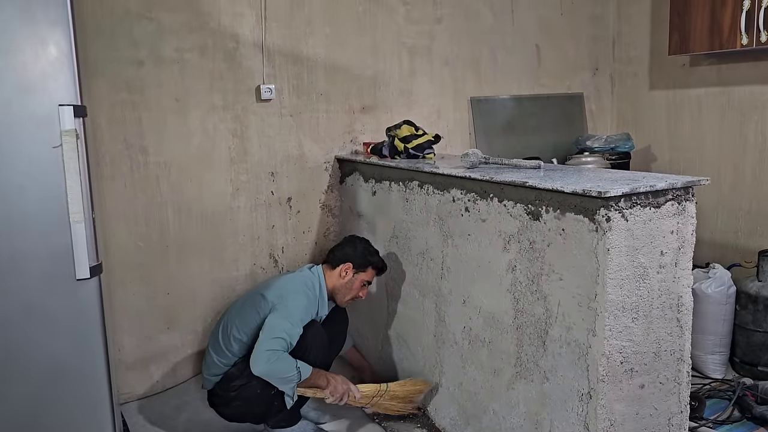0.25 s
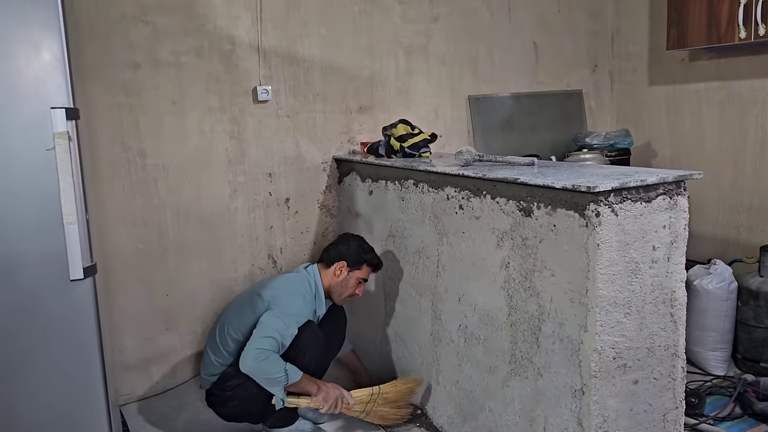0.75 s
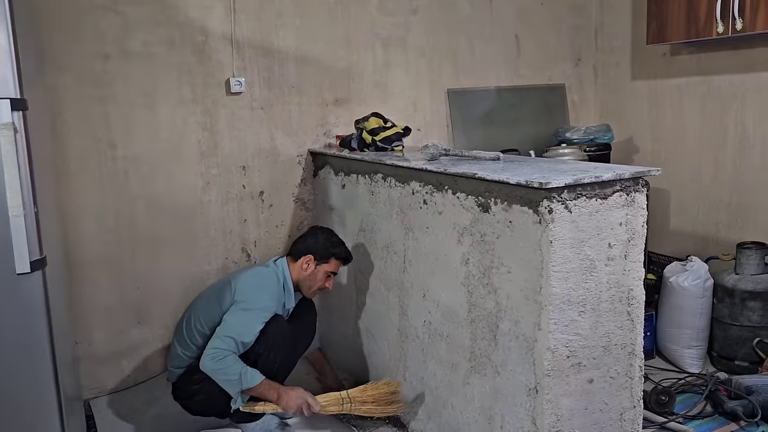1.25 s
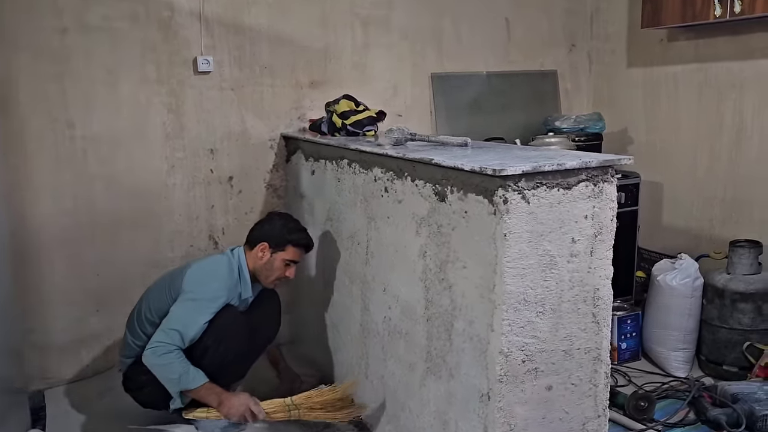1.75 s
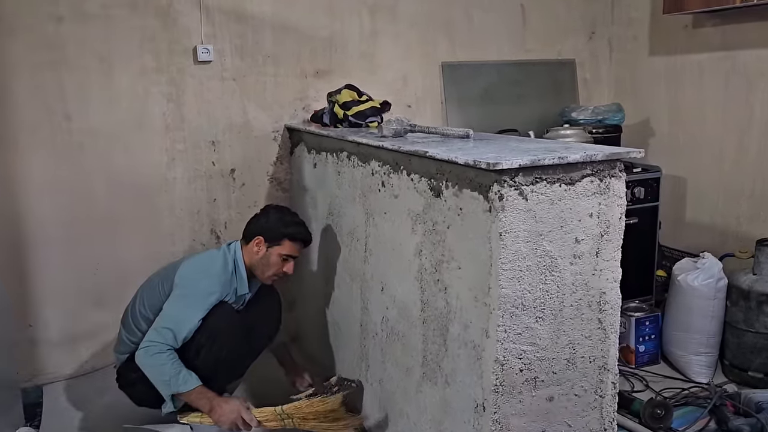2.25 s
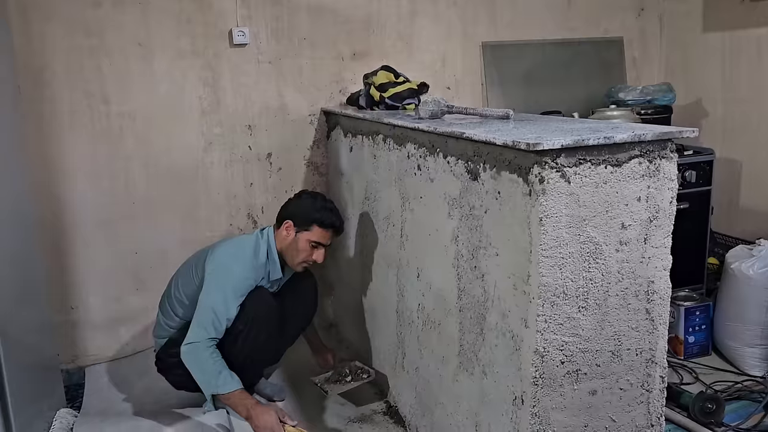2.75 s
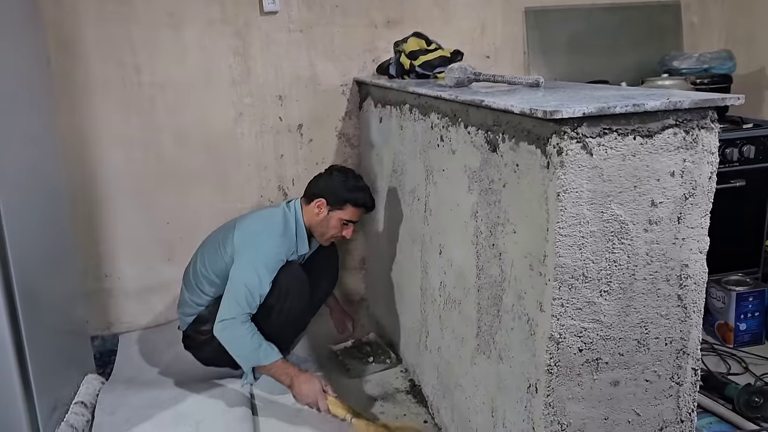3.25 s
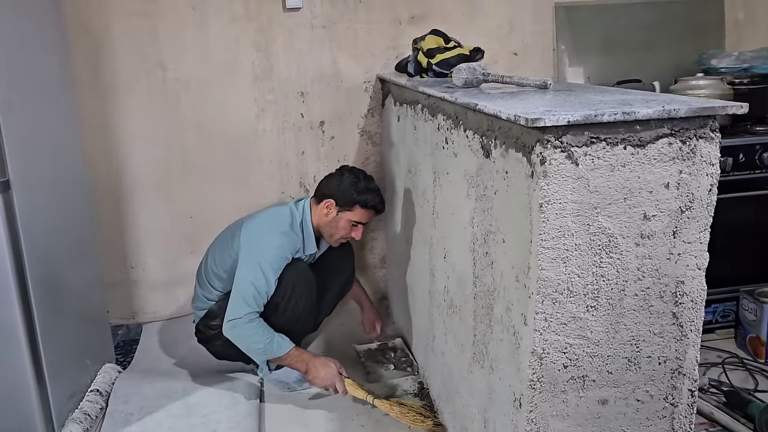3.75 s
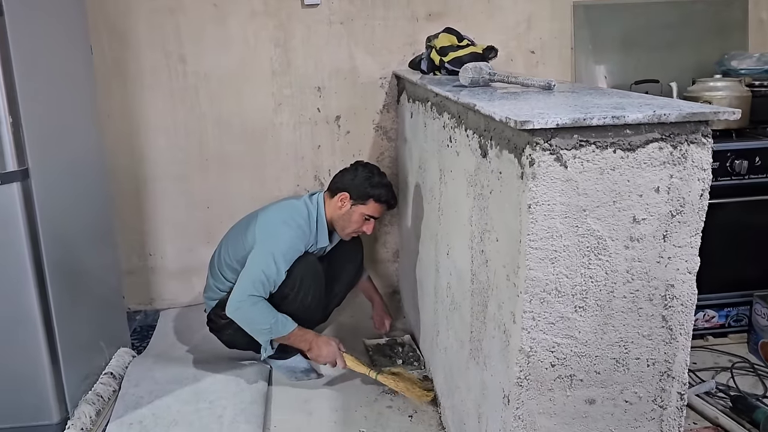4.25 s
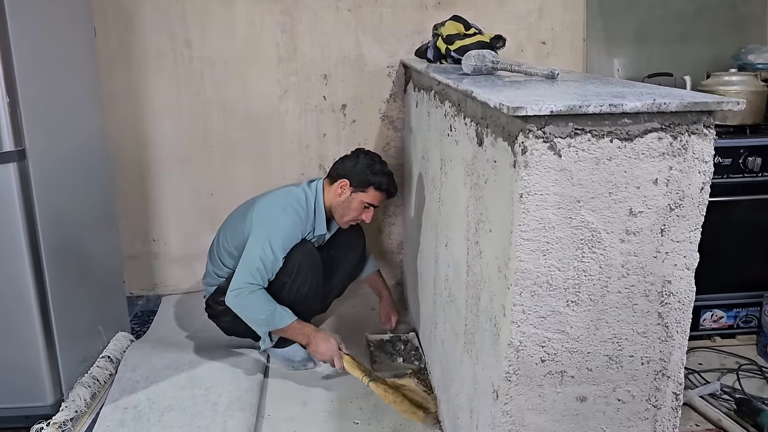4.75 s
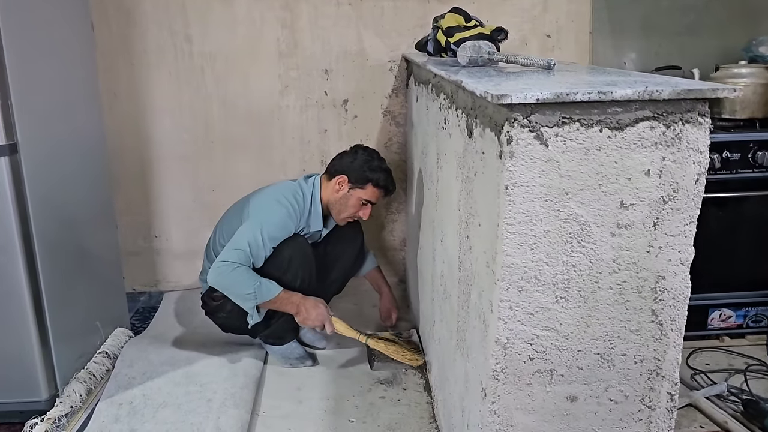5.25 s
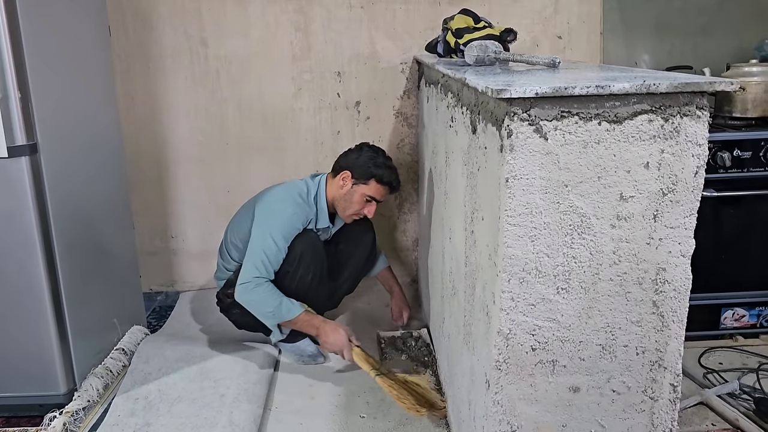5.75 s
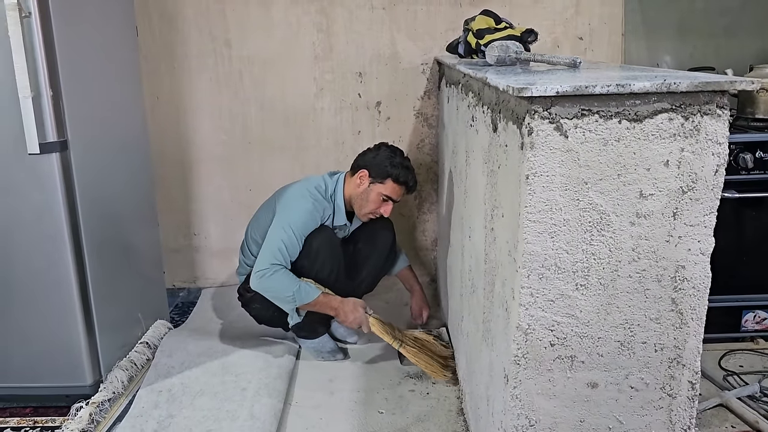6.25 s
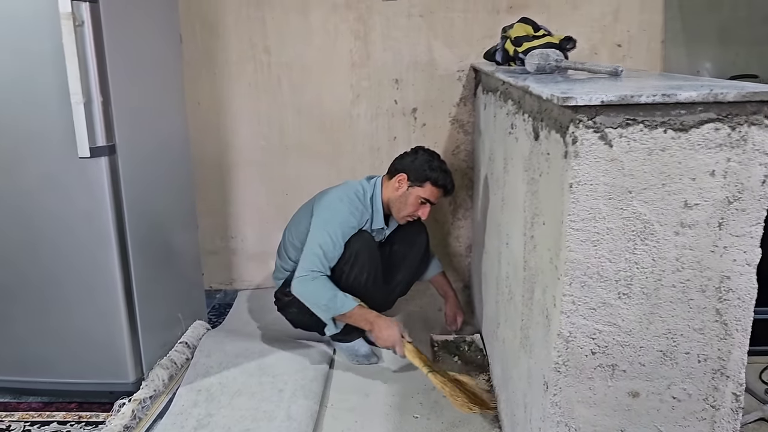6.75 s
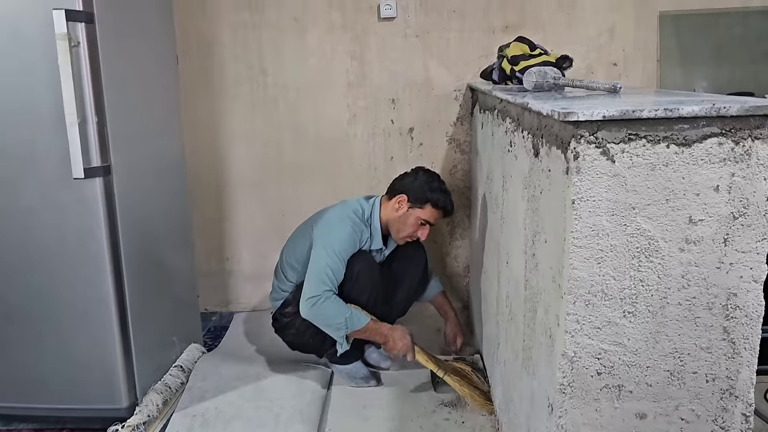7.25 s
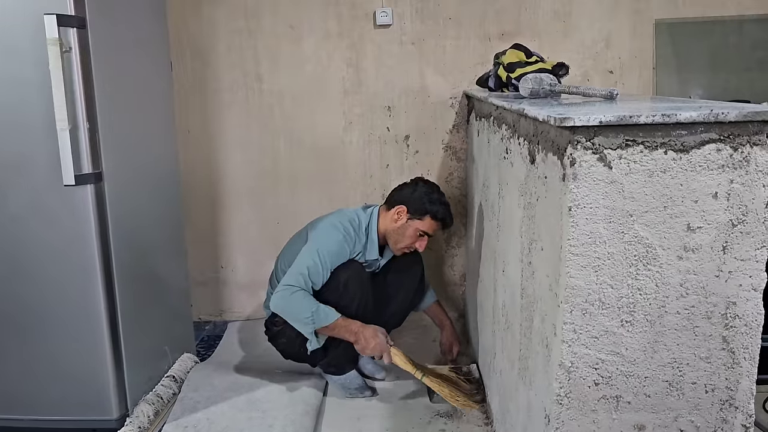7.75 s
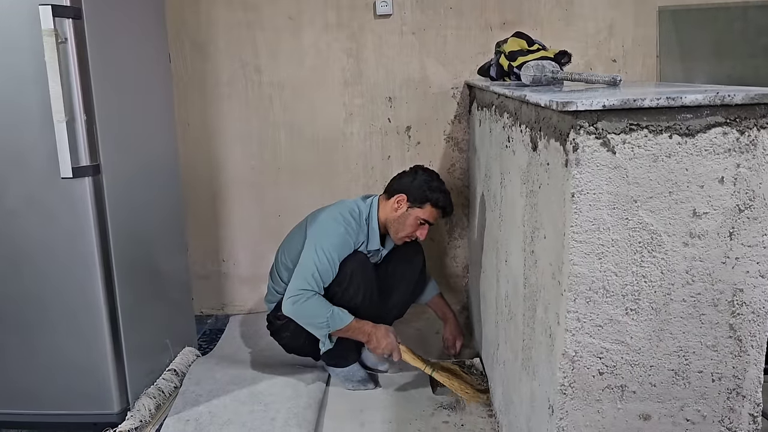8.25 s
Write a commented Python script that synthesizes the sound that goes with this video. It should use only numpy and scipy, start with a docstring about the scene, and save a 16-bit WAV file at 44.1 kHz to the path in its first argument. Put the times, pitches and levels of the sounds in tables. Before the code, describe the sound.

In a bare kitchen, a few bright metallic clinks and low thumps come first, followed by a scuff on the floor. Then a straw broom brushes crackling grit into a dustpan, whose lip taps and slides on the concrete. The scratchy strokes turn lighter and more spaced out toward the end. Soft handling rumble from the hand-held microphone and a faint hum run underneath.

```python
"""A metal piece clinks close by, three times and faintly a fourth, and something scuffs the floor.
Then a short straw broom sweeps grit over concrete into a dustpan, in a bare kitchen with a low hum.
Straw and grit sound as dense tiny impacts; the pan's lip knocks, ringing its modes, and slides.
The hand-held microphone rumbles and bumps softly all along as it is carried about."""
import sys
import numpy as np
from scipy import signal
from scipy.fft import rfft, irfft, next_fast_len
from scipy.io import wavfile
from scipy.ndimage import uniform_filter1d

SR = 44100
rng = np.random.default_rng(int(sys.argv[2]) if len(sys.argv) > 2 else 0)


def master(y):
    """Save y as 16-bit WAV."""
    cut = np.clip(np.atleast_2d(y).T, -1, 1)
    pcm = np.round(cut * 32767)  # scale
    wavfile.write(sys.argv[1], SR, pcm.astype(np.int16))


N = 375291


def broom(clump_db=5.0):
    """Straw tips flick over concrete, catch and roll the grit along; larger grains crackle."""
    # grit on concrete: (frequency [Hz], density [dB])
    grit_spectrum = [(190, -31), (330, -5.5), (480, -2.5), (640, -0.5), (850, -2), (1100, -1), (1500, -0.5),
                     (2200, -2), (2900, -3.5), (3900, -1.5), (5750, -8.5), (9500, -13), (11000, -32),
                     (16000, -34)]
    # straw hiss: (frequency [Hz], density [dB])
    straw_spectrum = [(700, -48), (1200, -10.5), (2300, -5.5), (3600, -2.5), (5500, -0.5), (7700, 2),
                      (9700, -0.5), (11000, -2), (12500, -3.5), (15200, -1.5), (16000, -16)]
    grit_db, straw_db = stroke_levels_db()
    catching = drift(70)
    grit = coloured(grains(per_s=1800, spread_db=3, wet_db=3.5), grit_spectrum)
    grit *= from_db(grit_db - 1.03 + 2.33 * catching)
    straw = coloured(grains(per_s=7000, spread_db=2, wet_db=-1.5), straw_spectrum)
    straw *= from_db(straw_db - 0.24 + 0.9 * catching)
    # crackle needs both straw and grit; it clumps as straws spring free
    crackle = coloured(grains(per_s=160, spread_db=4, wet_db=-5), straw_spectrum)
    crackle *= from_db(np.minimum(grit_db, straw_db) - 6.5 + clump_db * catching)
    return grit + straw + crackle


def stroke_levels_db(gather_db=4, lift_db_per_s=91, rest_grit_db=-76, rest_straw_db=-89.5):
    """Grit and straw levels: strokes add in power, and grit builds up along each."""
    # broom strokes: (start [s], rise [s], length [s], grit [dB], straw [dB])
    strokes = [(0, 0.0052, 0.017, -56, -59.5), (0.773, 0.046, 0.11, -61, -70.5),
               (1.291, 0.041, 0.063, -56.5, -70.5), (1.553, 0.064, 0.17, -62, -65.5),
               (1.758, 0.045, 0.77, -55, -64), (2.136, 0.084, 0.18, -48, -55.5),
               (2.341, 0.042, 0.11, -42.5, -44), (2.459, 0.049, 0.048, -41.5, -43.5),
               (2.587, 0.075, 0.055, -53, -61), (2.732, 0.048, 0.092, -55, -57.5),
               (3.021, 0.18, 0.4, -51, -47.5), (3.384, 0.16, 0.18, -45, -49.5),
               (3.703, 0.054, 0.21, -54.5, -56.5), (3.884, 0.1, 0.16, -48, -50),
               (4.147, 0.094, 0.23, -55, -54.5), (4.298, 0.12, 0.37, -43.0, -49),
               (4.716, 0.016, 0.22, -53.5, -50), (4.915, 0.13, 0.12, -48, -47),
               (5.137, 0.015, 0.15, -60.5, -66.5), (5.718, 0.098, 0.11, -62, -48),
               (5.895, 0.2, 0.25, -61, -50), (6.24, 0.05, 0.23, -69.5, -83),
               (6.728, 0.11, 0.095, -65, -47.5), (6.942, 0.066, 0.31, -58.5, -52.0),
               (7.309, 0.018, 0.17, -74, -66), (7.634, 0.03, 0.034, -69, -66.5),
               (7.752, 0.015, 0.26, -72.5, -72.5), (7.948, 0.17, 0.195, -60, -49.5),
               (8.307, 0.032, 0.206, -67.5, -67)]
    t = np.arange(N) / SR
    grit_power, straw_power = from_db(rest_grit_db) ** 2, from_db(rest_straw_db) ** 2
    for start_s, rise_s, length_s, grit_db, straw_db in strokes:
        pressure = gesture(start_s, rise_s, length_s, lift_db_per_s)
        gathered_db = gather_db * (np.clip((t - start_s) / length_s, 0, 1) - 0.5)
        grit_power += (pressure * from_db(grit_db + gathered_db)) ** 2
        straw_power += (pressure * from_db(straw_db)) ** 2
    return 10 * np.log10(grit_power), 10 * np.log10(straw_power)


def grains(per_s, spread_db, wet_db):
    """Tiny random impacts, mostly small and a few large, blurred by the room."""
    sizes = from_db(spread_db * np.minimum(rng.exponential(1, N), 4)) * rng.choice([-1, 1], N)
    clicks = sizes * (rng.random(N) < per_s / SR)
    return unit_rms(kitchen(np.array([clicks, np.roll(clicks, 23)]), wet_db))


def metal_clinks(rattle_hz=110, clean_db=-2, jangle_db=2, choke_t60_s=0.47):
    """Struck metal clashes, then its high modes ring, roughened by rattling, until a touch damps them."""
    # clinks: (time [s], ring [dB], clash [dB], strike point [0 rim, 1 face], rise [s], undamped [s])
    clinks = [(0.212, -37, -22, 0, 0.0058, 0.26), (.305, -43, -52, 0.2, 0.028, 0.17),
              (.447, -32.5, -33.5, 0.93, 0.011, 0.16), (0.66, -53.5, -50.5, 0.89, 0.0021, 0.066)]
    # metal modes: (frequency [Hz])
    modes_hz = [1723, 2191, 4990, 5884, 7590, 8226, 8678, 10010, 10170, 11540, 12750, 12950, 13120, 15190,
                15540, 15680]
    # ring of each mode: (t60 [s], rim strike [dB], face strike [dB])
    mode_rings = [(0.15, -12, -30), (0.65, -16, -21), (0.4, -11, -13), (0.55, -18.5, -7.5), (.28, -2, -5),
                  (0.46, -16, -8.5), (0.43, -19.5, -4.5), (0.43, -19, -6.5), (0.15, 8, -16.5),
                  (0.31, -4, 5.5), (.25, -6, 1.5), (0.43, 2.5, -14), (.3, -8.5, -14), (0.32, 2, 0),
                  (.26, -3.5, -4), (.26, 4, -7.5)]
    # contact noise: (frequency [Hz], density [dB])
    clash_spectrum = [(290, -23.5), (500, -4.5), (1130, -13), (2130, -12.5), (3020, -15), (5000, -14.5),
                      (8450, -12), (9300, -11.5), (10800, -16), (12700, -30), (16000, -9)]
    out, t = np.zeros((2, N)), np.arange(SR) / SR
    for start_s, ring_db, clash_db, face, rise_s, free_s in clinks:
        clink = from_db(clash_db) * coloured(rng.standard_normal((2, SR)), clash_spectrum)
        clink *= decay(t60_s=0.25) + from_db(-13) * decay(t60_s=0.87)
        rattle = rng.standard_normal((2, SR))
        for hz, (t60_s, rim_db, face_db) in zip(modes_hz, mode_rings):
            # loose contact spreads each mode into a narrow band
            rough = narrow_band(rattle, hz, rattle_hz) * decay(t60_s)
            ring = rough + from_db(clean_db) * mode(hz, t60_s, rng.uniform(0, np.pi, (2, 1)))
            ring *= from_db(jangle_db * drift(40)[:SR])
            clink += from_db(ring_db + rim_db + face * (face_db - rim_db)) * ring * lean_left(2.6)
        attack = np.minimum(t / rise_s, 1) ** 2
        choke = from_db(-60 * np.maximum(t - free_s, 0) / choke_t60_s)
        add(out, start_s, clink * attack * choke)
    return out


def dustpan_knocks(focus=3.5, rasp_db=-3):
    """The lip chatters briefly on the floor and excites the pan's modes around one pitch."""
    # knocks: (time [s], level [dB], ring centre [Hz], chatter time constant [s])
    knocks = [(.452, -33, 540, .008), (.488, -26.5, 695, 0.0029), (.520, -38, 640, 0.023),
              (.571, -46, 500, 0.0086), (.795, -49, 3500, 0.016), (1.297, -50.5, 1260, 0.016),
              (1.53, -40.5, 520, 0.0043), (1.603, -41, 580, 0.0066), (2.005, -34, 770, 0.00082),
              (2.175, -32.5, 900, 0.011), (2.176, -37.5, 1810, 0.016), (2.439, -34, 1410, 0.0046),
              (3.077, -44, 1030, 0.015), (5.256, -36, 840, 0.003), (5.266, -40, 970, 0.0045),
              (5.390, -49.5, 1100, 0.0096), (5.864, -47, 1000, .009), (6.129, -42, 1310, 0.018),
              (6.213, -44.5, 1570, 0.011), (6.237, -42.5, 1070, 0.011), (6.958, -43, 2900, .004),
              (6.977, -40.5, 557, 0.0033), (6.978, -42, 3000, 0.0024), (7.149, -48, 860, .003),
              (7.245, -39.5, 1100, 0.03), (7.458, -55, 503, .004), (7.565, -52, 2240, 0.0032),
              (8.322, -52, 1890, .006)]
    # dustpan modes: (frequency [Hz], level [dB], t60 [s])
    pan_modes = [(425, 7, 0.15), (496, 15.5, 0.015), (716, 12.5, 0.012), (766, 2, 0.049), (910, 2, 0.03),
                 (1026, -1, 0.05), (1320, 3.5, 0.0082), (1495, -3, 0.019), (1610, -2, 0.01),
                 (1780, -6, 0.037), (2180, -7, .03), (2930, 11, 0.021), (3800, -42, 0.02)]
    out, t = np.zeros(N), np.arange(SR // 8) / SR
    for start_s, db, centre_hz, chatter_s in knocks:
        contact = rng.standard_normal(len(t)) * np.exp(-t / chatter_s)
        body = np.zeros(SR)
        for k, (hz, mode_db, t60_s) in enumerate(pan_modes):
            excitation = np.exp(-focus * np.log2(hz / centre_hz) ** 2)
            body += from_db(mode_db) * excitation * mode(hz, t60_s) * (-1) ** k
        ring = unit_rms(signal.fftconvolve(contact, body)[:len(t)])
        rasp = narrow_band(contact, centre_hz, centre_hz, widen=1.4)
        add(out, start_s, from_db(db) * unit_peak(ring + from_db(rasp_db) * rasp))
    return kitchen(out, wet_db=-6) * lean_left(1.98)


def dustpan_squeaks(width_hz=130):
    """The pan's lip slides and sings faintly in one resonance."""
    # slides: (start [s], length [s], pitch [Hz], level [dB])
    slides = [(6.169, 0.43, 2900, -70), (7.807, 0.27, 2130, -68.5), (8.08, 0.21, 1040, -61.5)]
    out = np.zeros((2, N))
    for start_s, length_s, hz, db in slides:
        swell = np.sqrt(np.hanning(int(length_s * SR)))
        tone = narrow_band(rng.standard_normal((2, len(swell))), hz, width_hz)
        add(out, start_s, from_db(db) * tone * swell)
    return out


def grit_ticks(centre_hz=5640, scatter_octaves=0.2, t60_s=0.0086, gain_db=5):
    """A single stone or snapping straw gives one broad, very short tick."""
    # ticks: (time [s], relative level [dB])
    ticks = [(.795, -47), (.901, -47.5), (2.12, -41.5), (2.229, -34.5), (2.251, -33), (2.323, -32),
             (2.529, -28), (2.652, -36), (2.715, -34.5), (2.906, -45), (3.041, -49), (3.096, -34.5),
             (3.635, -39), (3.942, -38.5), (4.189, -43), (4.424, -27), (4.514, -26.5), (4.62, -28.5),
             (4.727, -28), (5.001, -28), (5.261, -41.5), (7.526, -43.5), (7.770, -49.5), (7.805, -52)]
    out = np.zeros((2, N))
    for start_s, db in ticks:
        hz = min(centre_hz * 2 ** (scatter_octaves * rng.standard_normal()), SR / 3)
        burst = rng.standard_normal((2, SR // 8)) * decay(t60_s)[:SR // 8]
        add(out, start_s, from_db(db + gain_db) * unit_peak(resonate(burst, hz, 0.95 * hz)))
    return kitchen(out, wet_db=-4.5) * lean_left(8)


def floor_scuff():
    """A short rub swells, rings in a few resonances and dies away."""
    # scuff: (time [s], level [dB], rise [s], t60 [s])
    scuffs = [(1.046, -35, 0.027, 0.31)]
    # rubbing noise: (frequency [Hz], density [dB])
    rub_spectrum = [(300, -6), (450, -0.5), (800, -3), (1250, 5.5), (1800, 4.5), (2600, 2), (3800, 0),
                    (5200, -3), (8000, -3.5), (12000, -15), (16000, -20)]
    # rub resonances: (frequency [Hz], width [Hz], gain [dB])
    resonances = [(817, 39, 9), (1255, 38, 10.5), (1890, 150, -5), (3900, 300, 4)]
    out, t = np.zeros((2, N)), np.arange(SR) / SR
    for start_s, db, rise_s, t60_s in scuffs:
        rub = coloured(rng.standard_normal((2, SR)), rub_spectrum)
        ring = sum(from_db(gain_db) * resonate(rub, hz, width_hz) for hz, width_hz, gain_db in resonances)
        envelope = np.minimum(t / rise_s, from_db(-60 * (t - rise_s) / t60_s))
        add(out, start_s, from_db(db) * unit_rms(rub + ring) * envelope)
    return out


def grip_rumble(even_s=0.034, firm_db=-48, deep_follow=0.6, gain_db=1.5):
    """The hand creeps over the microphone housing and makes it rumble."""
    # grip friction: (frequency [Hz], density [dB])
    rumble_spectrum = [(20, -51), (35, -31.5), (50, -11), (65, -21.5), (81, 2), (108, -19), (142, 5.5),
                       (175, -1.5), (215, -3), (295, -7.5), (345, -32.5), (480, -25), (800, -31.5),
                       (1200, -61)]
    grip_db = grip_level_db()
    creep = coloured(rng.standard_normal((2, N)), rumble_spectrum)
    creep /= np.sqrt(uniform_filter1d(np.mean(creep ** 2, axis=0), int(even_s * SR)) + 1e-9)
    # shifts raise the deepest part less than the rest
    deep = signal.sosfiltfilt(butter(2, 105), creep)
    deep_db = firm_db + deep_follow * (grip_db - firm_db)
    return from_db(gain_db) * ((creep - deep) * from_db(grip_db) + deep * from_db(deep_db))


def grip_level_db(creep_db=-57, swing_db=2, rise_s=0.028, settle_db_per_s=228):
    """Hand shifts over a faint creep, all sticking and slipping unevenly."""
    # hand shifts: (start [s], length [s], level [dB])
    shifts = [(0.053, 0.1, -49.5), (0.834, 0.022, -42.5), (1.04, 0.19, -52), (1.318, 0.046, -48),
              (1.793, 0.054, -44.5), (2.204, 0.064, -47), (2.334, 0.082, -51), (2.545, 0.033, -47),
              (2.785, 0.057, -45), (2.892, 0.023, -49), (3.001, 0.065, -46), (3.108, 0.072, -49),
              (3.218, 0.12, -48), (3.485, 0.32, -48), (3.892, 0.29, -42), (4.34, 0.088, -47.5),
              (4.55, 0.047, -45), (4.654, 0.05, -47), (4.82, 0.024, -42.0), (4.893, 0.057, -44),
              (5.011, 0.053, -43.5), (5.315, 0.051, -49), (5.443, 0.08, -46), (5.565, 0.13, -50),
              (5.757, 0.15, -45.5), (6.056, 0.16, -45.5), (6.301, 0.034, -47), (6.396, 0.071, -46),
              (6.644, 0.058, -45), (6.929, 0.057, -42.5), (7.214, 0.067, -46.5), (7.436, 0.088, -46.5),
              (7.738, 0.02, -43.5), (7.858, 0.02, -47.5), (7.973, 0.05, -44), (8.17, 0.043, -48.5),
              (8.257, 0.061, -43.5), (8.373, 0.032, -46.5)]
    power = from_db(creep_db) ** 2
    for start_s, length_s, db in shifts:
        power += (from_db(db) * gesture(start_s, rise_s, length_s, settle_db_per_s)) ** 2
    return 10 * np.log10(power) + swing_db * drift(16)


def housing_bumps():
    """Blows ring the microphone housing's low modes; only their upper part reaches the room."""
    # blows: (time [s], level [dB], low edge [Hz], high edge [Hz])
    blows = [(.217, -12.5, 40, 1290), (0.245, -24.5, 30, 280), (.265, -18.5, 60, 300),
             (.443, -23.5, 270, 700), (.488, -29, 332, 1200), (.570, -28.5, 256, 640),
             (.649, -41.5, 280, 600), (1.53, -37.5, 200, 485), (1.602, -36.5, 203, 480),
             (2.004, -37, 200, 480), (3.965, -27.5, 60, 266), (3.997, -30.5, 60, 293),
             (4.032, -36, 60, 230), (4.106, -27, 120, 450)]
    # housing modes: (frequency [Hz], level [dB], t60 [s])
    housing_modes = [(47.8, -10.5, 0.53), (77.3, -8.5, 0.4), (143.5, -1, 0.21), (209.8, 1, 0.29),
                     (244, 1.5, 0.21), (287.3, -9, 0.34), (326, -6.5, 0.14), (392.6, -4, 0.21),
                     (476.3, -11.5, 0.16), (654, -9, 0.065), (862, -14, 0.12), (1013, -15.5, 0.18),
                     (1265, -13, 0.056)]
    bumps = np.zeros(N)
    for start_s, db, low_hz, high_hz in blows:
        body = np.zeros(SR)
        for k, (hz, mode_db, t60_s) in enumerate(housing_modes):
            body += from_db(mode_db + rng.standard_normal()) * mode(hz, t60_s) * (-1) ** k
        thud = signal.sosfilt(butter(4, high_hz), body)
        thud = signal.sosfilt(butter(2, low_hz, "high"), thud)
        add(bumps, start_s, from_db(db) * unit_peak(thud))
    deep = signal.sosfiltfilt(butter(3, 240), bumps)
    return deep + kitchen(bumps - deep, wet_db=-8)


def room_tone(air_db=-62):
    """A low steady hum in faint hiss."""
    # hum partials: (frequency [Hz], level [dB])
    partials = [(100, -74), (150, -66.5), (200, -87)]
    # still room: (frequency [Hz], density [dB])
    air_spectrum = [(24, -42), (40, -18), (155, -3.5), (269, -11), (363, -15.5), (630, -16.5),
                    (1180, -26.5), (2100, -22.5), (2570, -39), (2980, -28), (6650, -38), (7540, -31),
                    (16000, -72.5)]
    t = np.arange(N) / SR
    hum = sum(from_db(db) * np.sin(2 * np.pi * (hz * t + rng.random())) for hz, db in partials)
    return hum + from_db(air_db) * coloured(rng.standard_normal((2, N)), air_spectrum)


def kitchen(x, wet_db, t60_s=0.53, build_s=0.0043, wall_hz=6500):
    """Direct sound plus dense reflections off bare walls, different on each side."""
    onset = np.minimum(np.arange(SR) / SR / build_s, 1)
    tail = signal.sosfilt(butter(1, wall_hz), rng.standard_normal((2, SR)) * decay(t60_s) * onset)
    tail *= from_db(wet_db) / np.sqrt(np.sum(tail ** 2) / 2)
    return x + signal.oaconvolve(np.atleast_2d(x), tail, axes=1)[:, :N]


def coloured(pair, spectrum):
    """Two unrelated signals shaped into a stereo pair with the given spectrum; rms 1."""
    # left-right likeness: (frequency [Hz], coherence [0-1])
    coherence = [(60, 0.95), (150, 1), (290, 0.83), (640, 0.44), (1400, 0.16), (15000, 0)]
    # stereo balance: (frequency [Hz], left over right [dB])
    balance = [(100, 0), (400, 2.5), (1300, 2), (4400, 2.5), (15000, 4)]
    size = next_fast_len(pair.shape[-1])
    hz = np.arange(size // 2 + 1) * SR / size
    mid, side = rfft(pair, size)
    alike = at_hz(coherence, hz)
    stereo = np.sqrt(1 + alike) * mid + np.sqrt(1 - alike) * np.array([side, -side])
    stereo *= lean_left(at_hz(balance, hz)) * from_db(at_hz(spectrum, hz))
    return unit_rms(irfft(stereo, size)[:, :pair.shape[-1]])


def gesture(start_s, rise_s, length_s, fall_db_per_s, depth_db=28):
    """Gain of a movement that swells, holds and dies away."""
    t = np.arange(N) / SR - start_s
    swell_db = -depth_db * np.maximum(1 - t / rise_s, 0) ** 2
    fall_db = fall_db_per_s * np.maximum(t - length_s, 0)
    return from_db(np.maximum(swell_db - fall_db, -200))


def drift(per_s):
    """Straight lines between unit-normal random values."""
    knots = rng.standard_normal(int(N / SR * per_s) + 2)
    return np.interp(np.arange(N) / SR * per_s, np.arange(len(knots)), knots)


def resonate(x, hz, width_hz):
    """Two-pole resonance, peak gain 1."""
    r = np.exp(-np.pi * width_hz / SR)
    feedback = [1, -2 * r * np.cos(2 * np.pi * hz / SR), r * r]
    return signal.lfilter(np.array([1, 0, -1]) * (1 - r * r) / 2, feedback, x)


def narrow_band(x, hz, width_hz, widen=2):
    """Two resonances in series, the second wider; rms 1."""
    return unit_rms(resonate(resonate(x, hz, width_hz), hz, widen * width_hz))


def decay(t60_s):
    return from_db(-60 * np.arange(SR) / SR / t60_s)


def mode(hz, t60_s, phase=0):
    return decay(t60_s) * np.sin(2 * np.pi * hz * np.arange(SR) / SR + phase)


def butter(order, hz, kind="low"):
    return signal.butter(order, hz, kind, fs=SR, output="sos")


def at_hz(points, hz):
    """Interpolate on a log-frequency axis."""
    knots_hz, values = np.transpose(points)
    return np.interp(np.log(hz + 1e-3), np.log(knots_hz), values)


def from_db(db):
    return 10 ** (np.asarray(db) / 20)


def lean_left(db):
    return from_db(np.array([[0.5], [-0.5]]) * db)


def unit_rms(x):
    return x / np.sqrt(np.mean(x ** 2) + 1e-20)


def unit_peak(x):
    return x / np.abs(x).max()


def add(out, start_s, sound):
    start = round(start_s * SR)
    out[..., start:start + sound.shape[-1]] += sound[..., :N - start]


def scene():
    """Sweeping, clinks and handling over the room tone."""
    floor = broom() + floor_scuff() + dustpan_knocks() + dustpan_squeaks() + grit_ticks()
    return floor + metal_clinks() + grip_rumble() + housing_bumps() + room_tone()


def record(dry):
    """Steep low-pass at 16 kHz."""
    return signal.sosfilt(signal.ellip(12, 0.1, 80, 16000, fs=SR, output="sos"), dry)


dry = scene()
out = record(dry)
master(out)
```